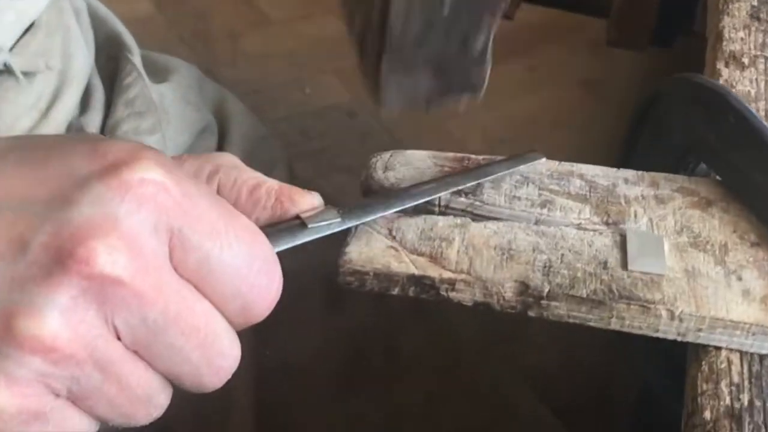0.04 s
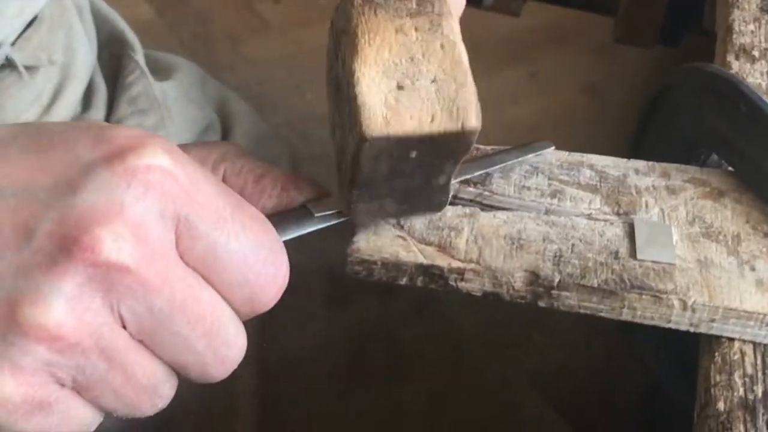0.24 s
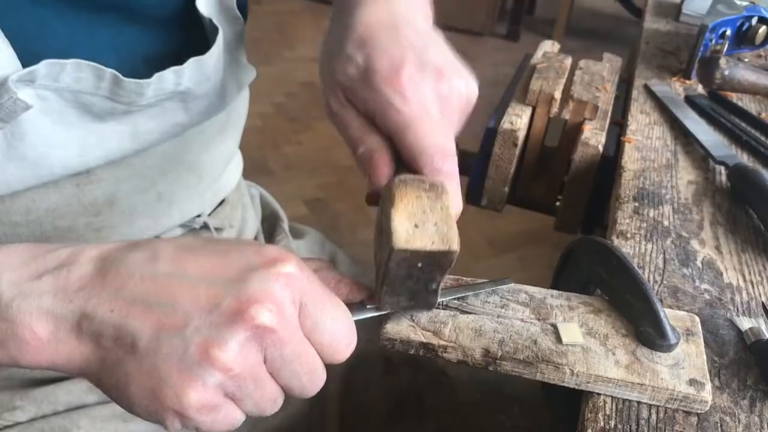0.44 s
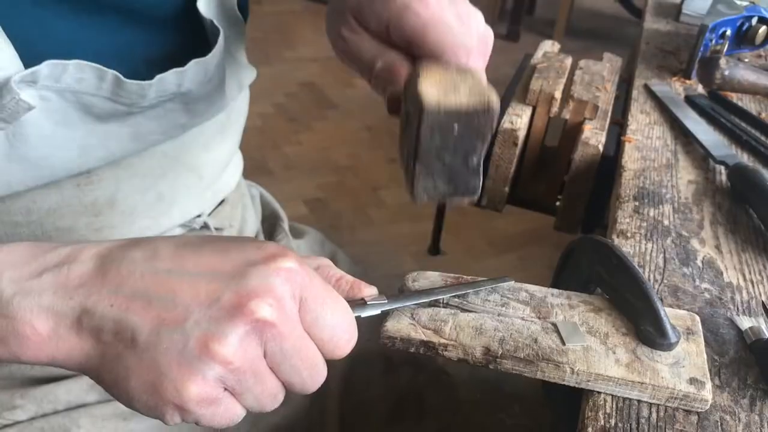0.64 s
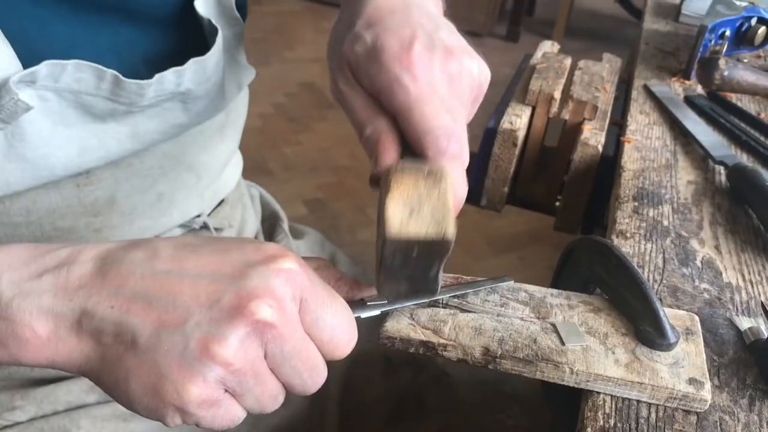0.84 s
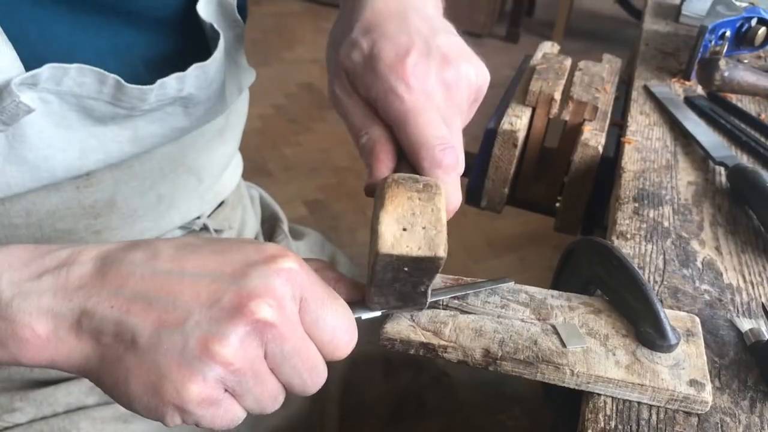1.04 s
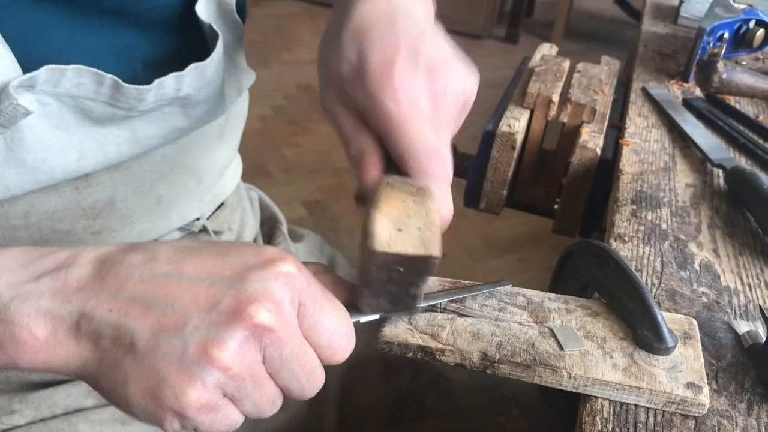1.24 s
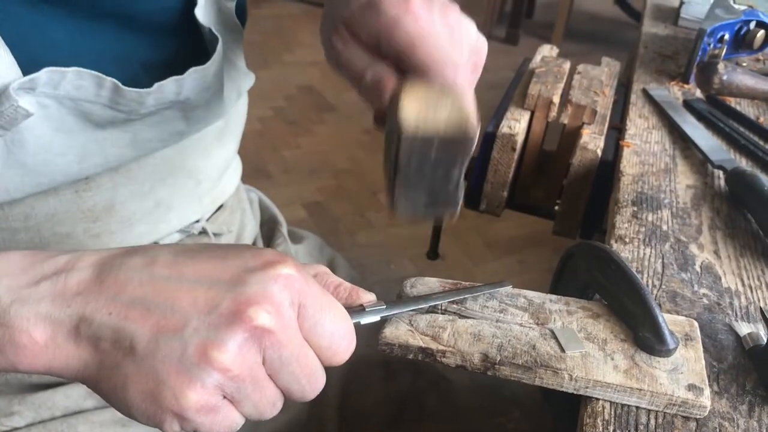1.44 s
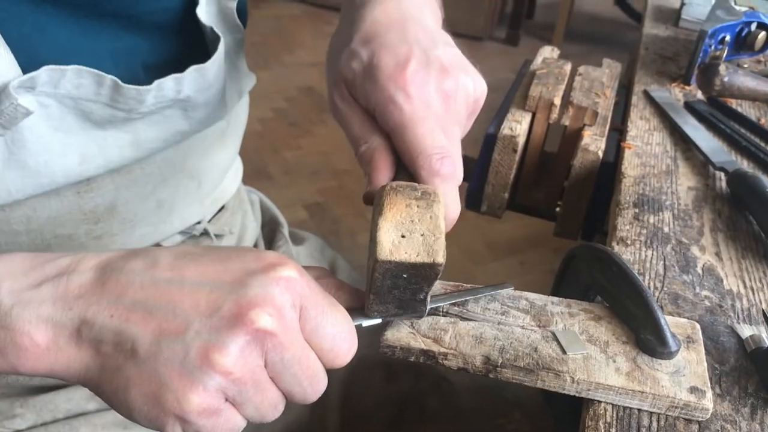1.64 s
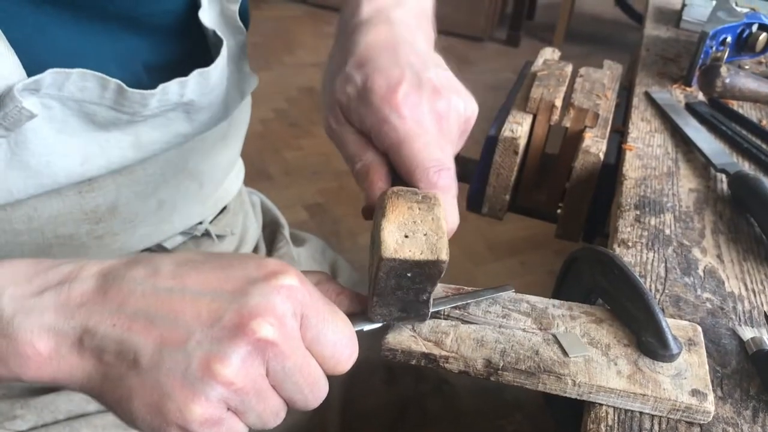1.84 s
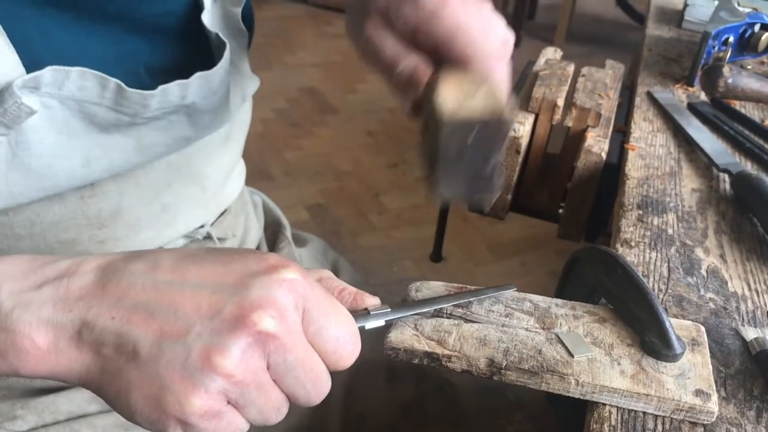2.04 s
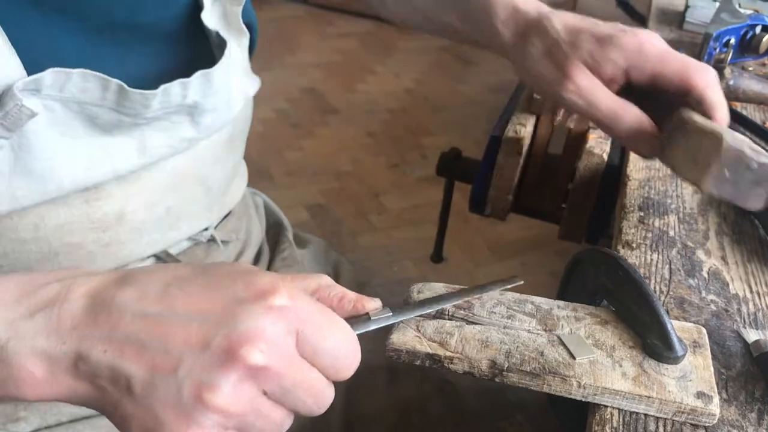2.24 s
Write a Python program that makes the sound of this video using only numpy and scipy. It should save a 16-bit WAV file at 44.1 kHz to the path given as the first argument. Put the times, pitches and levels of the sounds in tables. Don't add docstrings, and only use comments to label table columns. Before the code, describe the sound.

Wooden mallet taps on a metal strip over a steel rod, heard close in a small workshop. Seven even blows fall at about 0.17, 0.49, 0.76, 1.03, 1.3, 1.59 and 1.89 seconds, each a bright chattering crack, short dry ring and low wooden thud. Thin ticks follow, clearest near 1.05. Short room echoes fade into quiet air and a faint wavering low hum until about 2.3.

```python
import sys
import numpy as np
from scipy import signal
from scipy.fft import rfft, irfft
from scipy.io import wavfile
from scipy.ndimage import uniform_filter1d, minimum_filter1d

SR = 44100
rng = np.random.default_rng(int(sys.argv[2]) if len(sys.argv) > 2 else 0)


def gain_from_decibels(decibels):
    exponent = np.asarray(decibels, float) / 20
    return 10 ** exponent


def store_pcm(level_fs):
    pcm = np.round(np.clip(level_fs, -1, 1) * 32767).astype(np.int16)
    wavfile.write(sys.argv[1], SR, np.atleast_2d(pcm).T)


N = 100415
RING_SEND_DB = -11

# (time [s], peak level [dB], metal brightness [dB], mallet head ring [dB], pin thud [dB])
MALLET_BLOWS = [
    (0.1725, -10.5, -2.5, -3.5, -10.5),
    (0.492, -10.5, -1.5, -15, -9),
    (0.7627, -11, -2, -7.5, -9),
    (1.0274, -12, -3.5, -10, -8),
    (1.3, -12, 1, -10, -11),
    (1.5885, -10, -0.5, -13, -9.5),
    (1.8853, -9.5, -0.5, -8, -9.5),
]


def play_blows(bench):
    for time, *settings in MALLET_BLOWS:
        add(bench, time, blow(*settings))
    add(bench, -0.094, blow(-16, 1.5, 1.8, -16.5))


def blow(db, bright_db, head_db, pin_db):
    t = np.arange(9000) / SR
    force = contact_force(len(t))
    rings = metal_ring(force, t, bright_db) + head_ring(t, head_db)
    rings = gain_from_decibels(db) * rings
    crack = crack_grit(t) * np.minimum(t / 0.001, 1) + contact_ticks(force)
    crack = gain_from_decibels(db + bright_db) * crack
    thud = pin_thud(t, pin_db)
    clap = wall_clap(len(t), db + bright_db)
    direct = crack + thud + rings
    to_room = clap + thud + gain_from_decibels(RING_SEND_DB) * (crack + rings)
    return np.array([direct, to_room])


# (delay [s], level [dB])
CONTACTS = [
    (0., -9),
    (.0005, -5.5),
    (.0011, -4.5),
    (.0031, -1.5),
    (.0059, -7.5),
    (.0085, -13),
    (.012, -16),
]


def contact_force(size):
    force = np.zeros(size)
    for delay, level_db in CONTACTS:
        place = round(delay * SR * rng.uniform(.95, 1.05))
        force[place] = gain_from_decibels(level_db + rng.standard_normal())
    return force


# (pitch [Hz], level [dB], time to fall 60 dB [s])
METAL_TONES = [(1903, -5, 0.023), (2520, -1.5, 0.0081), (3057, 0.5, 0.022), (3630, 1.5, 0.013),
               (4160, -9, .02), (4596, -10, 0.013), (6430, -17, 0.034), (8570, -19, 0.011),
               (9400, -22, 0.035), (11530, -23.5, 0.005), (14000, -40.5, 0.0085)]


def metal_ring(force, t, bright_db):
    metal = gain_from_decibels(1 + bright_db) * modes(METAL_TONES, t, spread_db=3.5)
    return signal.oaconvolve(force, metal)[:len(t)] / 2


# (pitch [Hz], level [dB], time to fall 60 dB [s])
HEAD_TONES = [(840, -23, 0.12), (942, -15, 0.082), (1195, -8.5, 0.057), (1485, -3, 0.056)]


def head_ring(t, head_db):
    return gain_from_decibels(4 + head_db) * modes(HEAD_TONES, t, spread_db=-1.5)


# (pitch [Hz], level per Hz [dB])
CRACK_COLOUR = [(290, -27), (500, 9), (924, 0.5), (2980, -3), (7380, -13), (8180, -12), (15100, -26.5),
                (16500, -61)]


def crack_grit(t):
    crack_t60, rattle_t60 = 0.024, 0.27
    fall = gain_from_decibels(0.5 - 60 * t / crack_t60) + gain_from_decibels(-22 - 60 * t / rattle_t60)
    return coloured(CRACK_COLOUR, size=len(t)) * fall


# (pitch [Hz], level [dB])
TICK_COLOUR = [(400, -20), (1500, -11), (3500, 1.5), (7000, -6), (10000, -0.5), (16000, -10.5)]


def contact_ticks(force):
    return signal.oaconvolve(force, gain_from_decibels(6.5) * click(TICK_COLOUR))[:len(force)]


# (pitch [Hz], level [dB], time to fall 60 dB [s])
PIN_PUSH = [(341.2, 0.5, 0.051), (488.2, -18, 0.12), (690, -19.5, 0.063)]
# (pitch [Hz], level [dB], time to fall 60 dB [s])
PIN_PULL = [(118, -17, 0.059), (224.2, -16.5, 0.1), (270.7, -1.36, 0.072)]


def pin_thud(t, pin_db):
    late = np.maximum(t - 0.0017, 0)
    push = modes(PIN_PUSH, late, spread_db=-0.4)
    pull = modes(PIN_PULL, late, spread_db=3.6)
    return gain_from_decibels(pin_db) * (push - pull)


# (pitch [Hz], level [dB])
CLAP_COLOUR = [(80, -23), (200, 0.5), (600, -0.5), (1500, -3.5), (3500, -3.5), (7000, -18), (10000, -16.5),
               (16000, -18)]


def wall_clap(size, db):
    return np.pad(gain_from_decibels(db + 18) * click(CLAP_COLOUR), (0, size - 512))


# (time [s], level [dB], pitch [Hz])
STRIP_BOUNCES = [
    (0.194, -28, 9100),
    (0.217, -37, 5460),
    (0.510, -25.5, 9550),
    (0.518, -30, 9400),
    (0.784, -34, 8800),
    (1.052, -22.5, 9650),
    (1.356, -28.5, 9140),
    (1.625, -54, 9600),
    (1.900, -40, 8950),
    (2.263, -70, 11200),
]


def play_bounces(bench):
    for time, db, hz in STRIP_BOUNCES:
        add(bench, time, bounce(db, hz))


def bounce(db, hz):
    t = np.arange(1500) / SR
    grit_t60, ring_t60 = .018, .012
    band = signal.butter(2, [2500, 13000], "bandpass", fs=SR)
    grit = signal.lfilter(*band, rng.standard_normal(len(t)))
    grit = grit * gain_from_decibels(-3 - 60 * t / grit_t60)
    ring = modes([(hz, 1, ring_t60), (3020, -3, .025), (hz / 1.4, -8, .012)], t, spread_db=0.5)
    rise = gain_from_decibels(db) * np.minimum(t / 0.001, 1)
    return rise * np.array([grit + ring, grit + gain_from_decibels(RING_SEND_DB) * ring])


# (pitch [Hz], time to fall 60 dB [s])
ROOM_FALL = [(100, 0.29), (260, 0.25), (700, 0.29), (1840, 0.4), (4850, 0.4), (12800, 0.11)]
# (pitch [Hz], level [dB])
ROOM_COLOUR = [(100, 1), (300, 0), (1000, 8), (3000, -3.5), (8000, -1), (15000, -4.5)]


def room(x):
    taps = np.zeros(SR)
    at = np.arange(260, SR - 20, 20)
    taps[at + rng.integers(0, 20, len(at))] = rng.choice([-1., 1.], len(at))
    hz, t, z = signal.stft(taps, SR, nperseg=256)
    fall_db = -60 * t / read(ROOM_FALL, hz)[:, None]
    late_db, late_stretch = -6.5, 2.73
    shape = gain_from_decibels(fall_db) + gain_from_decibels(late_db + fall_db / late_stretch)
    colour = gain_from_decibels(read(ROOM_COLOUR, hz))[:, None]
    tail = signal.istft(z * shape * colour, SR, nperseg=256)[1]
    return signal.fftconvolve(x, tail / np.linalg.norm(tail))[:len(x)]


# (pitch [Hz], level per Hz [dB])
AIR_COLOUR = [(18, -4), (30, -19), (71, -2), (145, -10), (311, 6.5), (554, -12), (866, -7.5), (2170, -19),
              (16000, -53)]


def workshop_air():
    return gain_from_decibels(-52) * coloured(AIR_COLOUR, size=N)


# (time [s], level [dB])
DRONE_LEVEL = [
    (0.0, -72),
    (0.8, -58),
    (0.97, -61),
    (1.01, -55.5),
    (1.61, -53.5),
    (1.72, -72),
    (1.89, -51),
    (1.92, -70),
    (2.27, -51.5),
]


def distant_drone():
    hum_hz, wander_hz = 49.1, 15
    t = np.arange(N) / SR
    r = np.exp(-np.pi * wander_hz / SR)
    noise = rng.standard_normal(N) + 1j * rng.standard_normal(N)
    drift = signal.lfilter([1 - r], [1, -r], noise)
    wavering = 4.5 + drift / np.std(drift)
    drone = evened((wavering * np.exp(2j * np.pi * hum_hz * t)).real)
    return drone * gain_from_decibels(np.interp(t, *np.transpose(DRONE_LEVEL)))


def modes(table, t, spread_db):
    hz, db, t60 = np.transpose(table)[:, :, None]
    level_luck, pitch_luck = rng.standard_normal((2, len(table), 1))
    hz = hz * (1 + .004 * pitch_luck)
    level = gain_from_decibels(db + spread_db * level_luck - 60 * t / t60)
    return (level * np.sin(2 * np.pi * hz * t)).sum(0)


def click(spectrum):
    gain = np.log(gain_from_decibels(read(spectrum, abs(np.fft.fftfreq(2048, 1 / SR)))))
    phase = -signal.hilbert(gain).imag
    pulse = np.fft.ifft(np.exp(gain + 1j * phase)).real[:512]
    return pulse / np.linalg.norm(pulse)


def coloured(spectrum, size):
    z = rfft(rng.standard_normal(size))
    gain = gain_from_decibels(read(spectrum, np.fft.rfftfreq(size, 1 / SR)))
    return evened(irfft(z * gain, size))


def evened(x):
    return x / np.sqrt(np.mean(x ** 2) + 1e-20)


def read(points, hz):
    f, value = np.transpose(points)
    return np.interp(np.log(hz + 1), np.log(f + 1), value)


def add(mix, time, sound):
    part = mix[:, round((time + 1) * SR):][:, :sound.shape[1]]
    part += sound[:, :part.shape[1]]


def scene():
    bench = np.zeros((2, N + SR))
    play_blows(bench)
    play_bounces(bench)
    heard = bench[0] + gain_from_decibels(-10.5) * room(bench[1])
    mic_low = signal.butter(2, 78, "highpass", fs=SR)
    heard = signal.lfilter(*mic_low, heard)[SR:]
    return (heard + workshop_air() + distant_drone())[None]


def low_pass(x):
    return signal.sosfilt(signal.butter(12, 16910, fs=SR, output="sos"), x)


def record(dry):
    ceiling, recover_db_per_s = .32, 927
    over_db = np.maximum(20 * np.log10(abs(dry[0]) / ceiling + 1e-9), 0)
    fall = np.arange(N) * recover_db_per_s / SR
    held = np.maximum.accumulate(over_db + fall) - fall
    cut_db = uniform_filter1d(-minimum_filter1d(-held, size=17), size=17)
    fade = np.clip((N - np.arange(N)) / (0.007 * SR), 0, 1)
    limited = dry / gain_from_decibels(cut_db) * fade
    mic_top = signal.firwin(101, 15800, fs=SR)
    mix = signal.oaconvolve(limited, mic_top[None], "same")
    return low_pass(mix)


dry = scene()
out = record(dry)
store_pcm(out)
```